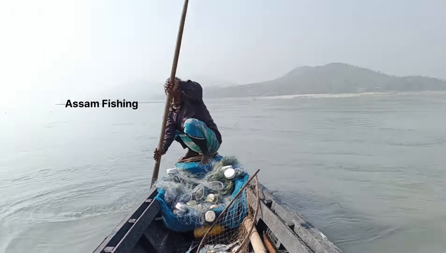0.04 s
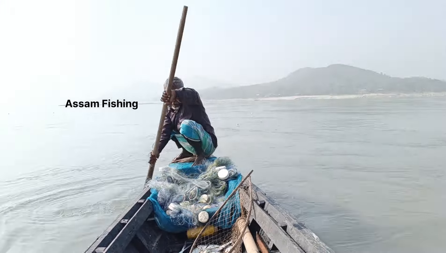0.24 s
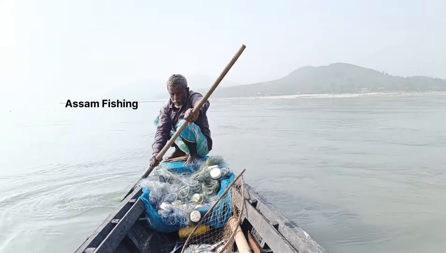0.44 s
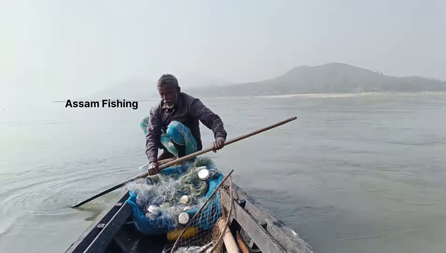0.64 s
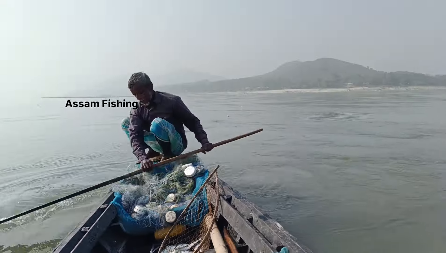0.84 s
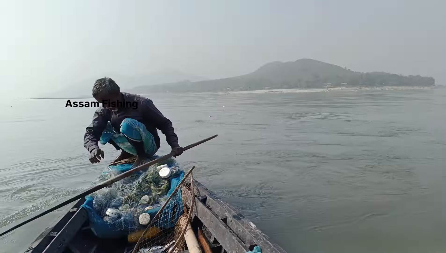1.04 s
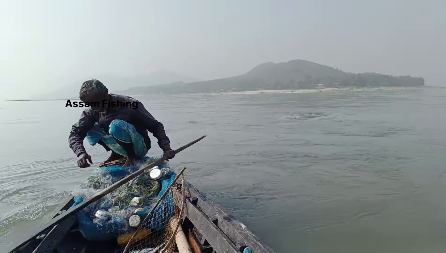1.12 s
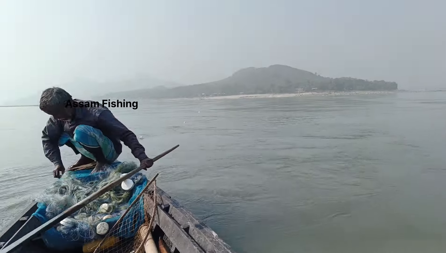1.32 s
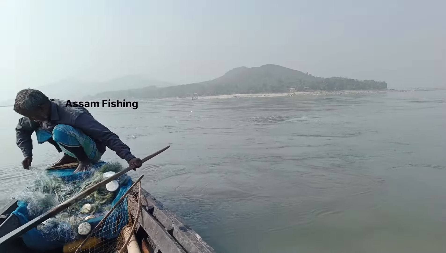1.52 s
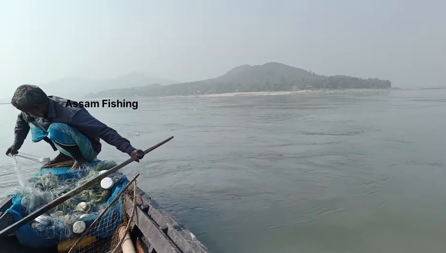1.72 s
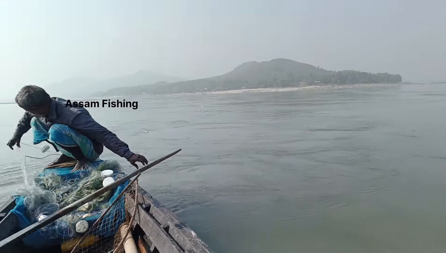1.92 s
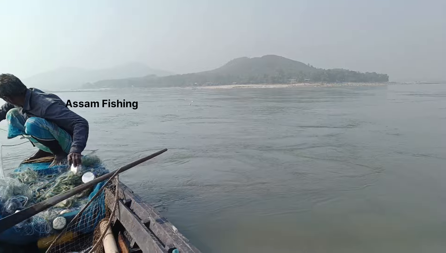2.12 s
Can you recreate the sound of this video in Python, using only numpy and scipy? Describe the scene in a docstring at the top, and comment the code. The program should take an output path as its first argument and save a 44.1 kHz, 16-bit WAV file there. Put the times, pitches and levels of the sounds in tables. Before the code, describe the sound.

A pole knocks on a wooden boat close by, softly at about 0.2 and 0.5 seconds. Water trickles, gurgles and sprays off it on the left, swelling around 1 and 1.5 seconds. A loud clack with a hollow boom comes at 1.3 seconds, followed by lighter knocks, then another loud one at 2.1. Throughout, a breeze rumbles and thumps on the microphone, mostly on the left.

```python
"""A pole knocks on the gunwale of a wooden boat, close by: pole modes clack, hull modes boom after.
The pole also scrapes once. Water runs, gurgles and sprays off it on the left (damped sines, noise
bursts, rising bubble tones) over the faint hiss of a calm river.
A breeze rumbles on both microphone ports and thumps on the left one."""
import sys
import numpy as np
from scipy import signal
from scipy.fft import rfft, irfft, next_fast_len
from scipy.io import wavfile
from scipy.ndimage import map_coordinates

SR = 44100
rng = np.random.default_rng(int(sys.argv[2]) if len(sys.argv) > 2 else 0)


def int16_out(signal):
    """Quantize to a 16-bit WAV file."""
    q = np.round(np.clip(np.atleast_2d(signal).T, -1, 1) * 32767)
    wavfile.write(sys.argv[1], SR, q.astype(np.int16))


N = 95432
TIME_S = np.arange(N) / SR

# pole on gunwale: start_s, clack_db, hardness_hz, tilt_db_per_oct,
# boom_lag_s, boom_db, plank_hz, boom_t60_ratio
KNOCKS = [(0.2426, -29.5, 570, -3, 0.016, -12, 154.4, 0.8),
          (0.471, -27.5, 602, -6.5, 0.01435, -7, 158.1, 1), (0.6554, -51, 4240, 2, 0.0102, -52, 149.5, 0.6),
          (0.682, -50.5, 3000, 6, 0.0081, -70, 151, 1.1), (1.3127, -7.5, 2980, 0.5, 0.0012, -1, 199, 0.36),
          (1.343, -20.5, 730, 6, .009, -11, 209.4, 0.5), (1.465, -17.5, 2920, 4.5, 0.016, -17, 138, 0.62),
          (1.475, -22.5, 1320, 8, 0.0102, -22, 254, 0.86), (1.509, -34, 880, 3, .01, -22, 136, 1.02),
          (1.669, -33.5, 590, 7.5, 0.0077, -27, 134, 0.87),
          (2.1269, -7.5, 2030, 4.5, 0.00748, -1, 126, 0.65)]
# pole resonances: pitch_hz, level_db, t60_s
POLE_MODES = [(399.6, -2.5, 0.099), (520, 6, 0.055), (587.6, 2.5, 0.063), (790, 6.5, 0.027),
              (851, 5, 0.043), (1072, -4.5, 0.033), (1226, -4, 0.033), (1608, -7, 0.03), (1920, 0, 0.022),
              (2410, 2, 0.016), (3270, 2.5, 0.012)]
# hull resonances: pitch_hz, level_db, t60_s
HULL_MODES = [(103.7, -39.5, .25), (135.1, 4, 0.21), (169.4, 6, 0.13), (214, -1, 0.27), (241, 5, 0.091),
              (305, -13.5, 0.31)]
# pole sliding, one row: start_s, length_s, pitch_hz, width_hz, rub_db, tap_over_rub_db, tap_decay_s
SCRAPE = (.6548, .12, 1850, 170, -57, 21, .005)
# water off the pole: time_s, trickle_db, spray_db, gurgle_db
WATER_LEVELS = [(0, -53, -68, -57), (.04, -55.5, -69, -58), (0.109, -59, -70, -57.5), (.14, -83, -78, -71),
                (0.271, -57.5, -67, -50), (.31, -74, -74.5, -57.5), (0.441, -71.5, -75.5, -71.5),
                (.49, -50.5, -59, -43.5), (0.572, -63.5, -68.5, -64), (.64, -63.5, -74, -60),
                (.67, -58.5, -71, -59), (0.761, -57.5, -70, -64.5), (0.798, -52.5, -58.5, -58.5),
                (0.871, -44, -56.5, -53), (0.944, -38, -47.5, -47.5), (1.002, -41.5, -54, -54),
                (1.112, -49, -53.5, -51.5), (1.153, -52.5, -64, -54.5), (1.258, -48.5, -62.5, -54),
                (1.362, -43, -49, -65), (1.43, -49.5, -60, -45.5), (1.488, -37, -42.5, -33),
                (1.562, -49.5, -57, -48.5), (1.622, -57.5, -49.5, -49.5), (1.672, -51.5, -55.5, -48.5),
                (1.748, -49.5, -66.5, -52), (1.898, -56.5, -72.5, -56), (2.092, -57.5, -68.5, -56),
                (2.107, -42.5, -62, -42), (2.16, -42.5, -50, -47)]
# water spectra: freq_hz, density_db
TRICKLE_SPECTRUM = [(590, -37), (1000, 1.5), (1500, 3), (2310, 0), (3100, -2), (4500, -2.5), (5220, -10),
                    (7000, -24.5), (9100, -27.5), (15400, -120)]
SPRAY_SPECTRUM = [(3000, -40.5), (5000, -18), (6300, -3), (7400, -13), (8500, -4.5), (10700, -6.5),
                  (12500, -16), (15000, -14.5), (16000, -29)]
GURGLE_SPECTRUM = [(160, -41.5), (280, -3), (493, -3), (560, -2), (851, -6), (1170, -10), (1400, -17),
                   (1820, -59), (3080, -120)]
RIVER_SPECTRUM = [(600, -19), (1300, -1.5), (2200, -7), (4000, -13), (9000, -32.5), (15400, -120)]
# spray spurts and sharp pole cracks: start_s, top_rms_db, centre_hz, rise_s, width_oct
NOISE_BURSTS = [(0.2677, -56, 3720, 0.0055, 1), (0.3275, -53, 2400, 0.0013, 0.6),
                (0.5245, -51, 11900, 0.001, 0.5), (0.602, -51.5, 1990, 0.0022, 0.67),
                (0.654, -46.5, 3430, 0.0011, 0.21), (0.7849, -45, 2600, 0.0044, 0.42),
                (0.7978, -44.5, 7300, 0.0021, 0.66), (0.841, -42, 3060, 0.0032, 0.14),
                (0.864, -41, 3750, 0.00093, 0.44), (0.8826, -39, 3030, 0.0018, 0.24),
                (0.888, -35.5, 3100, 0.0013, 0.16), (0.9141, -41, 4030, 0.006, 0.13),
                (0.951, -36, 4000, 0.0016, 0.14), (0.96, -36, 3800, 0.002, 0.14),
                (1.013, -40, 3500, 0.0033, 0.27), (1.041, -44, 4530, 0.0056, 0.13),
                (1.0677, -42.5, 2920, 0.0085, 0.62), (1.0993, -33, 3320, 0.0011, 0.7),
                (1.1041, -40.5, 2880, 0.0041, 1), (1.1795, -37, 4040, 0.0012, 0.36),
                (1.2002, -46.5, 3300, 0.0032, 0.54), (1.27, -32, 4580, 0.0014, 0.22),
                (1.272, -46, 10300, 0.002, .3), (1.313, -36.5, 11200, 0.0021, .6),
                (1.4643, -17.5, 3280, 0.00061, 0.32), (1.421, -42, 3040, 0.0046, 0.9),
                (1.451, -32.5, 3700, 0.0097, 0.74), (1.491, -35, 11900, 0.0058, 0.28),
                (1.5006, -32.5, 3650, 0.0018, 0.98), (1.5455, -45.5, 3600, 0.0058, 1),
                (1.5784, -45, 3200, 0.0071, 0.74), (1.6023, -40, 3340, 0.0091, 0.34),
                (1.61, -34, 6140, 0.0048, 0.4), (1.6173, -32, 6000, 0.0027, 1),
                (1.6414, -41, 3750, 0.0069, 0.79), (1.808, -43, 3070, 0.0024, 0.42),
                (1.8751, -42.5, 2070, 0.0015, 0.34), (1.999, -43, 1650, .002, .2),
                (2.011, -44, 2430, .0015, 0.18), (2.07, -44, 1970, .004, 0.31),
                (2.101, -52, 2400, 0.0078, 1), (2.127, -41.5, 4540, 0.0036, 0.83)]
# bubbles and drips: start_s, level_db, pitch_hz, rise_oct_per_s, t60_s, life_s
BUBBLES = [(0.071, -46.5, 440, 16.7, 2, 0.038), (0.109, -39.5, 2180, 3, 0.039, 0.0099),
           (0.126, -35.5, 1400, 0.31, 0.03, 0.014), (.398, -52, 490, 2.4, 0.47, 0.076),
           (.785, -35.5, 855, 2.2, 0.044, 0.021), (.893, -22.5, 568, 0.41, 0.1, 0.14),
           (0.898, -38, 1160, 1.7, 0.27, 0.058), (.966, -37, 524, 5.7, 0.62, 0.0243),
           (.982, -30, 619, 5.2, 0.12, 0.028), (0.977, -7.5, 2610, 2.7, 0.009, 0.023),
           (1.022, -29.5, 745, 2.9, 0.07, 0.065), (1.225, -55, 495, 31, 0.52, .04),
           (1.912, -50, 688, 12.3, 0.52, 0.053), (1.955, -43.5, 457, 3.2, 0.15, 0.048),
           (2.029, -37, 360, 1.5, 0.11, 0.053)]
# wind buffeting: time_s, left_db, right_db
GUST_LEVELS = [(0, -30, -40), (0.099, -42.5, -43), (.2, -30.5, -37), (.3, -27.5, -41), (0.401, -34, -43),
               (.5, -39, -45), (.65, -31, -40), (0.801, -31, -41), (0.951, -38, -39.5), (1.1, -35.5, -44),
               (1.22, -33.5, -38), (1.37, -23.5, -32), (1.5, -31.5, -44), (1.62, -35, -43.5),
               (1.732, -35, -44.5), (1.831, -30, -36), (1.95, -35, -42), (2.07, -40.5, -38.5),
               (2.16, -35, -30)]
# wind spectrum at each port: freq_hz, density_db
LEFT_WIND_SPECTRUM = [(20, -33), (50, 4), (100, 3.5), (160, -1.5), (250, -15), (400, -47.5), (800, -84)]
RIGHT_WIND_SPECTRUM = [(20, -11.5), (50, 1.5), (100, -17), (160, -14.5), (250, -34), (400, -36), (800, -99)]
# wind thumps, left port: centre_s, level_db, pitch_hz, half_width_s
THUMPS = [(0.005, -16.5, 104, 0.0081), (0.347, -19, 110, 0.0084), (0.381, -24, 73.6, 0.016),
          (0.43, -18.5, 80, 0.0084), (0.569, -36, 103, 0.0074), (0.639, -18.5, 124, 0.0044),
          (0.675, -23.5, 105.5, 0.0049), (0.711, -10, 102, 0.0058), (0.751, -24.5, 102, 0.0062),
          (0.829, -21, 106, 0.011), (1.006, -24.5, 109, 0.014), (1.076, -19, 101, 0.0061),
          (1.135, -20.5, 102, 0.0046), (1.171, -14, 102, 0.0093), (1.203, -5, 134, 0.003),
          (1.394, -35, 120, 0.0036), (1.424, -20, 90.5, 0.0064), (1.45, -18, 98, 0.0056),
          (1.473, -19, 138, 0.012), (1.69, -10, 118, 0.0054), (1.723, -9, 118.5, 0.0051),
          (1.86, -10, 123, 0.0081)]
# shadow on the right port: freq_hz, loss_db
RIGHT_SHADOW = [(150, -0.5), (700, 2.5), (1300, 3), (3000, 3), (9000, 13), (14000, 12.5)]
# likeness of right port to left: freq_hz, coherence_ratio
PORT_COHERENCE = [(200, 0.98), (800, 0.73), (3000, 0.084), (9000, 0.1)]


def knocks():
    """Each strike clacks the pole, then booms the hull; little radiates below low_cut_hz."""
    low_cut_hz = 81
    out, t = np.zeros(N), TIME_S[:SR // 2]
    for start_s, clack_db, hardness_hz, tilt_db_per_oct, lag_s, boom_db, plank_hz, t60_ratio in KNOCKS:
        add(out, start_s, amp(clack_db) * pole_clack(t, hardness_hz, tilt_db_per_oct))
        add(out, start_s + lag_s, amp(boom_db) * hull_boom(t, plank_hz, t60_ratio))
    return filtered(out, lambda hz: (1j * hz / (low_cut_hz + 1j * hz)) ** 2)


def pole_clack(t, hardness_hz, tilt_db_per_oct):
    """Pole modes, a crack and duller contact chatter; a harder hit is brighter and rises faster."""
    def colour_db(hz):
        return tilt_db_per_oct * np.log2((hz + 50) / 1000) - 15 * np.log10(1 + (hz / hardness_hz) ** 4)

    chatter_hz, contact_cycles = 1900, 1.7
    crack = noise(len(t), lambda hz: amp(colour_db(hz)) * hz / (hz + 300))
    crack *= decay(t, level_db=4.5, t60_s=0.032)
    chatter = noise(len(t), lambda hz: amp(colour_db(hz)) * band(hz, chatter_hz, width_oct=1))
    chatter *= decay(t, level_db=-5, t60_s=0.097)
    modes = ring(t, POLE_MODES, colour_db, rise_cycles=2.29)
    return (modes + crack + chatter) * (1 - np.exp(-t * hardness_hz / contact_cycles))


def hull_boom(t, plank_hz, t60_ratio):
    """Hull modes, driven hardest near the pitch of the struck plank."""
    width_oct, rise_s = 0.28, 0.004
    modes = [(hz, level_db, t60_s * t60_ratio) for hz, level_db, t60_s in HULL_MODES]
    boom = ring(t, modes, lambda hz: -6 * (np.log2(hz / plank_hz) / width_oct) ** 2, rise_cycles=0.21)
    return boom * (1 - np.exp(-t / rise_s)) ** 2


def ring(t, modes, weight_db, rise_cycles):
    """Damped modes, unevenly struck; each swells over its own periods, so treble comes first."""
    scatter_db = 1.5
    out = np.zeros(len(t))
    for hz, level_db, t60_s in modes:
        struck_db = level_db + weight_db(hz) + scatter_db * rng.normal()
        swell = 1 - np.exp(-t * hz / rise_cycles)
        out += decay(t, struck_db, t60_s) * swell * np.sin(2 * np.pi * hz * t)
    return out


def scrape():
    """A tap, then rubbing on the gunwale excites one pole resonance."""
    start_s, length_s, pitch_hz, width_hz, rub_db, tap_over_rub_db, tap_decay_s = SCRAPE
    t = np.maximum(TIME_S - start_s, 0)
    rub = unit_rms(noise(N, lambda hz: np.exp(-((hz - pitch_hz) / width_hz) ** 2)))
    rub *= np.exp(-(t / length_s) ** 4)
    tap = amp(tap_over_rub_db) * np.sin(2 * np.pi * pitch_hz * t) * np.exp(-t / tap_decay_s)
    return amp(rub_db) * (TIME_S > start_s) * (rub + tap)


def runoff():
    """Water off the pole: trickle and spray flutter together above a low gurgle."""
    trickle_db, spray_db, gurgle_db = level_curves(WATER_LEVELS)
    flutter_db = 0.32 * wobble(rate_hz=33.07)
    spray = droplets(SPRAY_SPECTRUM, rate_hz=1500, low_hz=5500, high_hz=15000,
                     decay_cycles=5, spread_db=3.5, noise_share=0.45, count=4000)
    trickle = droplets(TRICKLE_SPECTRUM, rate_hz=1600, low_hz=2000, high_hz=5000,
                       decay_cycles=7, spread_db=2.5, noise_share=0.5, count=4000)
    gurgle = droplets(GURGLE_SPECTRUM, rate_hz=150, low_hz=351, high_hz=1290,
                      decay_cycles=6.1, spread_db=1.2, noise_share=0.6, count=500)
    treble = amp(trickle_db) * trickle + amp(spray_db) * spray
    return amp(flutter_db) * treble + amp(gurgle_db) * gurgle


def droplets(spectrum, rate_hz, low_hz, high_hz, decay_cycles, spread_db, noise_share, count):
    """Random droplets ring as damped, rising sines over noise; shaped by spectrum, rms 1."""
    gap_draw, pitch_draw, size_draw = rng.random((count, 3)).T[:, :, None]
    starts = (np.cumsum(-np.log(gap_draw), axis=0) / rate_hz * SR).astype(int)
    pitch_hz = low_hz * (high_hz / low_hz) ** pitch_draw
    size_db = -spread_db * np.log(np.maximum(size_draw, 0.04))  # largest 4% capped
    offsets = np.arange(900)
    cycles = pitch_hz * offsets / SR
    age = cycles / decay_cycles
    grains = amp(size_db) * np.sin(2 * np.pi * cycles * (1 + 0.029 * age)) * np.exp(-age)
    patter = np.bincount((starts + offsets).ravel(), grains.ravel(), N)[:N]
    # whiten to the density of unit noise
    patter = unit_rms(filtered(patter, lambda hz: np.clip(hz, low_hz, high_hz)))
    patter *= np.sqrt((high_hz - low_hz) / (SR / 2))
    mix = np.sqrt(1 - noise_share) * patter + np.sqrt(noise_share) * rng.standard_normal(N)
    return unit_rms(filtered(mix, lambda hz: amp(log_interp(spectrum, hz))))


def noise_bursts():
    """Short bursts of band noise: spurts of spray, and sharp cracks of the pole's taps and knocks."""
    out, t = np.zeros(N), TIME_S[:SR // 5]
    for start_s, top_rms_db, centre_hz, rise_s, width_oct in NOISE_BURSTS:
        hiss = unit_rms(noise(len(t), lambda hz: band(hz, centre_hz, width_oct)))
        envelope = t / rise_s * np.exp(1 - t / rise_s)
        add(out, start_s, amp(top_rms_db) * hiss * envelope)
    return out


def bubbles():
    """Bubbles ring as rising sines until they burst; wobbling varies pitch and strength."""
    attack_s, waver_oct, rough_db = 0.0043, 0.02, 3
    out, t = np.zeros(N), TIME_S[:SR // 5]
    for start_s, level_db, pitch_hz, rise_oct_per_s, t60_s, life_s in BUBBLES:
        glide_oct = rise_oct_per_s * t + waver_oct * wobble(rate_hz=83)[:len(t)]
        phase = 2 * np.pi * np.cumsum(np.minimum(pitch_hz * 2 ** glide_oct, SR / 4)) / SR
        gate = (1 - np.exp(-t / attack_s)) * np.exp(-(t / life_s) ** 4)
        add(out, start_s, decay(t, level_db, t60_s) * gate * np.sin(phase))
    return out * amp(rough_db * wobble(rate_hz=120))


def wind_thumps():
    """Wind hits the left port: pointed low pulses, each on a slower pressure push."""
    push_db, push_width_ratio = -13.5, 2.63
    left = np.zeros(N)
    for centre_s, level_db, pitch_hz, half_width_s in THUMPS:
        t = TIME_S - centre_s
        envelope = np.exp(-np.abs(t / half_width_s) ** 1.086)  # lower exponent: sharper point
        pulse = envelope * np.cos(2 * np.pi * (pitch_hz * t + rng.random()))
        push = np.exp(-(t / half_width_s / push_width_ratio) ** 2) * rng.choice([-1, 1])
        left += amp(level_db) * (pulse + amp(push_db) * push)
    return np.array([left, np.zeros(N)])


def wind_rumble():
    """Lumpy buffeting, independent at each port."""
    lumps_db = 5
    channels = []
    for gust_db, spectrum in zip(level_curves(GUST_LEVELS), (LEFT_WIND_SPECTRUM, RIGHT_WIND_SPECTRUM)):
        lumps = amp(lumps_db * wobble(rate_hz=22.25))
        rumble = noise(N, lambda hz: amp(log_interp(spectrum, hz)))
        channels.append(amp(gust_db) * unit_rms(lumps * rumble))
    return np.array(channels)


def river(rms_db):
    """Smooth hiss of open water."""
    return amp(rms_db) * unit_rms(noise(N, lambda hz: amp(log_interp(RIVER_SPECTRUM, hz))))


def ports(left, lag_s):
    """Stereo pair: the right port hears later, duller and partly by shifting scattered paths."""
    def shadow(hz):
        return amp(-log_interp(RIGHT_SHADOW, hz)) * np.exp(-2j * np.pi * hz * lag_s)

    paths = rng.standard_normal(300) * decay(TIME_S[:300], level_db=0, t60_s=0.0014)
    drifting = np.real(signal.hilbert(left) * np.exp(2j * np.pi * wobble(rate_hz=40)))
    scatter = np.convolve(drifting, paths / np.linalg.norm(paths))[:N]
    direct = filtered(left, lambda hz: shadow(hz) * log_interp(PORT_COHERENCE, hz))
    diffuse = filtered(scatter, lambda hz: shadow(hz) * np.sqrt(1 - log_interp(PORT_COHERENCE, hz) ** 2))
    return np.array([left, direct + diffuse])


def amp(db):
    return 10 ** (np.asarray(db) / 20)


def decay(t, level_db, t60_s):
    return amp(level_db - 60 * t / t60_s)


def unit_rms(x):
    return x / np.sqrt(np.mean(x ** 2) + 1e-20)


def band(hz, centre_hz, width_oct):
    return np.exp(-(np.log2((hz + 1) / centre_hz) / width_oct) ** 2)


def log_interp(points, hz):
    freqs_hz, values = np.transpose(points)
    return np.interp(np.log(hz + 1), np.log(freqs_hz + 1), values)


def level_curves(table):
    """One per-sample curve for each level column."""
    times_s, *columns_db = np.transpose(table)
    return [np.interp(TIME_S, times_s, column_db) for column_db in columns_db]


def filtered(x, response):
    """Apply the complex gain response(hz)."""
    size = next_fast_len(len(x) + 8192)
    return irfft(rfft(x, size) * response(np.fft.rfftfreq(size, 1 / SR)), size)[:len(x)]


def noise(samples, response):
    return filtered(rng.standard_normal(samples), response)


def wobble(rate_hz):
    """Smooth random curve, rate_hz knots a second."""
    return map_coordinates(rng.standard_normal(1000), [TIME_S * rate_hz])


def add(track, start_s, sound):
    start = max(round(start_s * SR), 0)
    track[start:start + len(sound)] += sound[:N - start]


def scene():
    """Boat and water reach both ports; wind blows on them directly."""
    boat = ports(knocks() + scrape(), lag_s=0.0002)
    water_and_cracks = ports(runoff() + noise_bursts() + bubbles() + river(rms_db=-66), lag_s=0.00029)
    return boat + water_and_cracks + wind_thumps() + wind_rumble()


def record(dry):
    """Soft clip, then band limit."""
    ceiling, top_hz = 0.95, 16000
    soft = dry / (1 + np.abs(dry / ceiling) ** 6) ** (1 / 6)
    return np.array([filtered(channel, lambda hz: hz < top_hz) for channel in soft])


dry = scene()
out = record(dry)
int16_out(out)
```